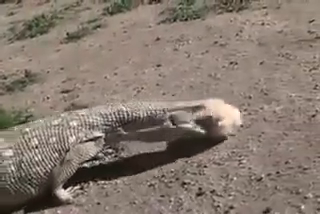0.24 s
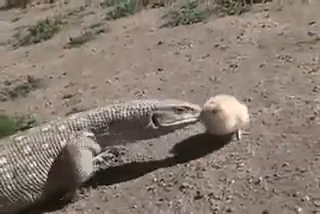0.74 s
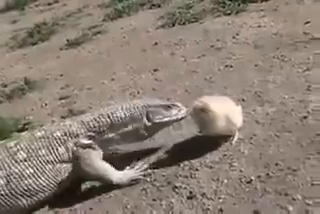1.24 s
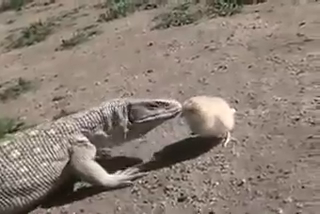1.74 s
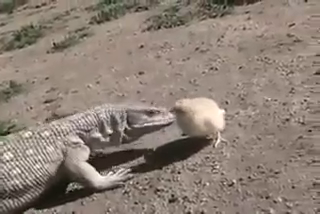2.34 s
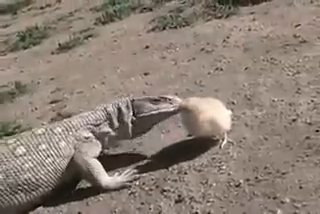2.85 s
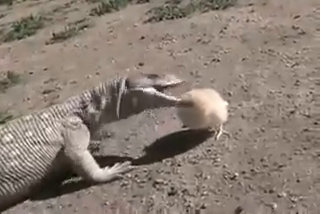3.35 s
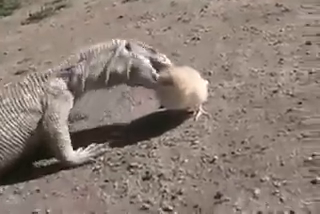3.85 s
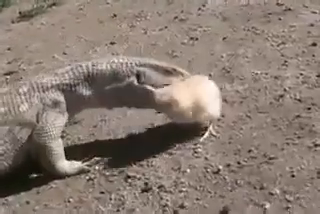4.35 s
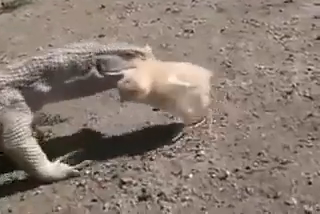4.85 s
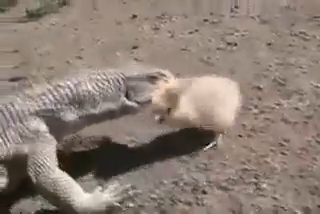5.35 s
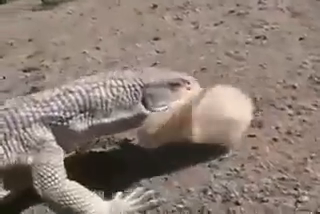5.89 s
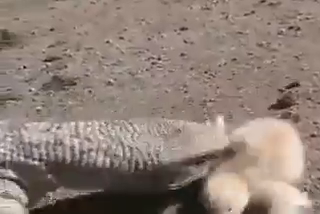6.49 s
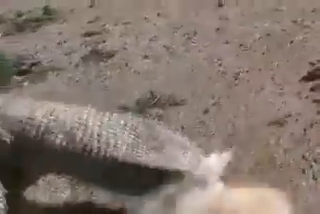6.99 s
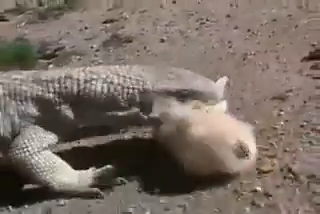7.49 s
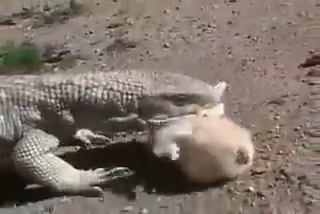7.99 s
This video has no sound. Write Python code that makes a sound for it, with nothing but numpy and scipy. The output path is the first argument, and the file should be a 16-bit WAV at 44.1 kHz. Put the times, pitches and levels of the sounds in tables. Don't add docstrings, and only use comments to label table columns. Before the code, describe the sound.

Throughout, a quiet low wash of distant traffic and wind with a wavering engine hum, swelling slightly near 1.3 and 5.2 s. From 0 to 1.5 s, faint songbirds repeat chirps and thin whistles at a distance, with tiny dry leaf rustles; a near chick gives soft rising peeps at 0.2, 0.5 and 0.9 s, then 2.2 s. Far birds return from 2.4 s, including a quick falling trill at 3.1-3.5 s. Softly brighter peeps come at 4.3, 4.6 and 4.9 s, with scattered grit clicks. At about 5.3 s the first loud, piercing distress peep swells, followed at 5.9, 6.4, 6.9, 7.5 and 8.0 s by more, strained around 5 kHz, hoarse and cracking sharply downward. Dull gravel ticks cluster between 5.4 and 6.5 s; a far low hoot wavers at 5.9-6.4 s. Close outdoor stereo, almost dry, slight ground echo, limited treble.

```python
import sys
import numpy as np
from scipy import signal
from scipy.fft import rfft, irfft, next_fast_len
from scipy.io import wavfile
from scipy.ndimage import uniform_filter1d

SR = 44100
rng = np.random.default_rng(int(sys.argv[2]) if len(sys.argv) > 2 else 0)


def inscribe(sig):
    pcm = np.round(np.clip(np.atleast_2d(sig).T, -1, 1) * 32767)
    wavfile.write(sys.argv[1], SR, pcm.astype(np.int16))


def how_loud(loudness_db):
    steps = np.asarray(loudness_db, float) / 20
    return 10 ** steps


N = 362943

# (frequency [Hz], density [dB per Hz])
WASH_SPECTRUM = [(25, -44), (58, -2.5), (169, -6), (520, -17.5), (1140, -17.5), (1600, -27.5), (6200, -37),
                 (10000, -43.5)]
# (time [s], level [dB])
WASH_LEVEL_DB = [(0.0, -55.5), (6.17, -53.5), (7.15, -56.5), (7.36, -52.5), (8.23, -54)]
# (frequency [Hz], left-right likeness [-1 to 1])
WASH_LIKENESS = [(40, 0.29), (130, 0.15), (300, 0.16), (600, 0.16), (1200, 0.065), (2500, 0.67),
                 (5000, 0.2), (10000, .2)]
# (frequency [Hz], left minus right [dB])
WASH_BALANCE_DB = [(60, -4), (170, -0.5), (480, 0.5), (1350, -0.5), (3830, 1.5), (10800, -2.5)]
# (frequency [Hz], level [dB])
ENGINE_LINES = [(68, -62), (136, -62), (204, -64.5), (990, -72.5), (1163, -74.5), (1346, -74),
                (1690, -79.5), (1890, -76.5)]
# (middle [s], length [s], rise [dB])
ENGINE_LOAD = [
    (1.35, .75, 8),
    (5.25, .55, 6),
]

# (length [s], start [Hz], middle [Hz], end [Hz])
UP = (.088, 2620, 3080, 3050)
DOWN = (.14, 2630, 2400, 2280)
COO = (0.0634, 1500, 1950, 1740)
PIP = (0.085, 2450, 2900, 2940)
LIFT = (.12, 2250, 2310, 2460)
# (start [s], note shape, level [dB])
SONGS = [(.124, UP, -59), (.221, DOWN, -61), (.525, UP, -54), (.593, DOWN, -60), (.947, UP, -59.5),
         (1.032, DOWN, -60), (1.393, UP, -59.5), (1.476, DOWN, -61), (.03, COO, -61), (.415, COO, -58),
         (.834, COO, -58), (1.276, COO, -61), (2.409, LIFT, -62), (2.735, PIP, -66), (2.8, LIFT, -62),
         (2.925, PIP, -62), (2.985, LIFT, -57), (3.1, PIP, -63), (3.15, LIFT, -63), (3.565, PIP, -61),
         (3.63, LIFT, -58.5), (3.8, LIFT, -64), (4.655, PIP, -58.5), (4.73, LIFT, -59), (.615, PIP, -57)]
# (start [s], length [s], start [Hz], end [Hz], level
# [dB])
FAR_WHISTLES = [(.2, 0.13, 4900, 4960, -61.5), (0.39, 0.26, 4780, 4840, -60.5),
                (.433, .11, 3550, 3960, -65), (.67, .042, 5400, 5300, -65), (0.79, .05, 4350, 4500, -64),
                (.79, 0.055, 5400, 5200, -63), (.928, .08, 5350, 5000, -61),
                (2.56, 0.57, 4440, 4180, -65.5), (3.173, .05, 3680, 4000, -57),
                (3.287, .048, 3810, 3560, -57), (3.205, .04, 2300, 3600, -65),
                (3.48, 0.045, 2400, 4000, -63), (3.55, .04, 2000, 3000, -66), (3.87, 0.12, 4600, 4520, -63),
                (3.98, .1, 4520, 4480, -58), (5.699, .19, 4080, 4010, -61), (3.415, .05, 2320, 4300, -62),
                (5.722, 0.037, 3200, 3040, -54.5), (7.863, 0.1, 4034, 3880, -61),
                (7.75, .055, 3300, 2950, -56), (.84, 0.045, 4350, 4800, -67), (2.98, .15, 4250, 4200, -62),
                (4.235, .03, 3400, 3100, -60), (3.38, .05, 3000, 3200, -66), (3.66, .05, 2100, 3100, -66),
                (1.0, 1.0, 5800, 5780, -80), (4.06, .09, 4500, 4480, -63)]
# (start [s], start [Hz], level [dB])
TRILL_NOTES = [(3.13, 5120, -57.5), (3.195, 5130, -61), (3.254, 5140, -55.5), (3.315, 5240, -61),
               (3.375, 4880, -49.5), (3.44, 4920, -59)]
# (start [s], length [s], centre [Hz], width [Hz], level [dB])
BUSH_CHATTER = [
    (0.13, 1, 4600, 2400, -66),
    (3.3, 0.49, 4700, 300, -65),
    (3.98, 0.2, 500, 350, -51.5),
    (5, .5, 420, 250, -58.5),
    (3.35, 0.64, 3200, 2500, -62.5),
    (3.42, .34, 4800, 600, -65),
    (3.84, .32, 4600, 350, -67),
    (3.8, .1, 3800, 700, -67),
]
# (start [s], length [s], centre [Hz],
# level [dB])
LEAF_RUSTLES = [(.11, .05, 6500, -68), (.52, 0.052, 6300, -67), (0.933, 0.058, 6800, -67),
                (1.53, .04, 7500, -70), (2.052, .1, 8000, -66), (2.948, 0.045, 7200, -70),
                (3.57, 0.054, 7200, -69), (3.8, .04, 7300, -67), (4.12, .04, 6540, -64),
                (4.468, .05, 7500, -63), (4.95, .07, 7500, -67), (6.75, .03, 8500, -65),
                (6.73, .19, 4500, -66), (7.74, .08, 4300, -59.5)]
# (start [s], length [s], start [Hz], top [Hz], level [dB])
SOFT_PEEP_NOTES = [
    (0.22, 0.07, 2200, 3440, -53),
    (0.518, 0.087, 2140, 3920, -43),
    (0.922, 0.051, 2900, 3620, -48),
    (2.227, 0.046, 2810, 3630, -48),
    (4.266, 0.075, 2110, 3840, -45),
    (4.609, 0.064, 2200, 3870, -42.5),
    (4.948, 0.063, 2300, 3790, -44.5),
]
# (time [s], peak [dB], centre [Hz])
GRIT_TICKS = [(3.657, -42, 1700), (4.498, -35, 1600), (5.384, -32.5, 1310), (5.513, -34.5, 867),
              (5.639, -37, 980), (5.741, -36, 800), (5.814, -33, 891), (5.854, -31, 760),
              (5.895, -29.5, 821), (5.94, -30, 830), (5.974, -31, 810), (6.012, -29.5, 803),
              (6.054, -34, 834), (6.109, -41.5, 794), (6.214, -40.5, 826), (6.272, -37, 800),
              (6.326, -33.5, 829), (6.426, -33, 668), (6.527, -34, 730)]
# (time [s], peak [dB], centre [Hz])
BRIGHT_TICKS = [(1.55, -61, 7500), (2.468, -40.5, 8170), (3.752, -47, 3100), (3.885, -48, 3400),
                (4.44, -46, 3900), (5.084, -41, 3200), (5.386, -30.5, 2800)]

# (time [s], pitch [Hz], effort [dB])
LOUD_PEEPS = [
    [(5.238, 3660, -46), (5.28, 4790, -31.5), (5.325, 5124, -25), (5.371, 5375, -12), (5.435, 5345, -9.5),
     (5.507, 4880, -13.5), (5.548, 4790, -22.5), (5.585, 4746, -22.5), (5.688, 3550, -38.5)],
    [(5.911, 3330, -32), (5.926, 4300, -27.5), (5.946, 4697, -14), (5.99, 5216, -11.5), (6.04, 5240, -9),
     (6.07, 5147, -11), (6.102, 4680, -13), (6.122, 3420, -14), (6.202, 2220, -31)],
    [(6.421, 3697, -22), (6.442, 4420, -15), (6.478, 5090, -9), (6.525, 5150, -9.5), (6.595, 5050, -10.5),
     (6.619, 4560, -9), (6.628, 3230, -15), (6.66, 2903, -17.5), (6.7, 2328, -31.5)],
    [(6.93, 4200, -21), (6.947, 5080, -15), (6.972, 5180, -19), (7.008, 5360, -9), (7.076, 5380, -10.5),
     (7.105, 4870, -15.5), (7.127, 4550, -10), (7.135, 3420, -15), (7.21, 2210, -25.5)],
    [(7.464, 4446, -32), (7.52, 5113, -19), (7.566, 5200, -22), (7.606, 5384, -19.5), (7.638, 5046, -12),
     (7.658, 4500, -7), (7.667, 3600, -13.5), (7.704, 2863, -19), (7.73, 2075, -30)],
    [(7.982, 3698, -26.5), (8.002, 4497, -21.5), (8.03, 4866, -22), (8.058, 5013, -15), (8.137, 5088, -9.5),
     (8.16, 4600, -8), (8.173, 3250, -14.5), (8.214, 2887, -20), (8.245, 1850, -21)],]
PEEP_BRIGHT_DB = [-5, 6.5, -3, -8, -14, -8]
# (multiple of pitch [1], level [dB])
OVERTONE_LINES = [(2, 2), (3, -10), (4, -32)]
# (multiple of pitch [1], level [dB])
HALF_LINE_PARTIALS = [(.5, -18), (1.5, 0.5), (2.5, -18), (3.5, -22)]
# (pitch [Hz], octave over effort [dB])
OCTAVE_RULE = [(2500, -11), (3050, -1), (3400, -7.5), (4300, -20.5), (4900, -17), (5120, -18), (5200, -28),
               (5300, -52)]
# (pitch [Hz], half lines over effort [dB])
LOW_HALF_RULE = [(3000, -30), (3400, -30.5), (4200, -58)]
# (middle [s], length [s], half line [dB], lowest line over its rule [dB])
UNEVEN_STRETCHES = [(5.305, 0.037, -34.5, 9.5), (5.49, 0.067, -28.5, -2.5), (5.945, 0.017, -35.5, 11.5),
                    (6.097, 0.039, -41, -16), (6.172, 0.038, -21.5, -3), (6.462, .025, -41, -0.5),
                    (6.569, .035, -32, -2.5), (6.67, 0.049, -22.5, 1), (6.99, 0.052, -18.5, -7),
                    (7.188, .028, -22.5, 1.5), (7.546, 0.086, -26.5, 4), (7.684, 0.02, -22.5, -6.5),
                    (7.716, 0.022, -25, -6), (8.065, .12, -44.5, 16.5), (8.21, .03, -22.5, -9)]
# (middle [s], length [s], added flutter [0-1], rasp [dB])
HOARSE_STRETCHES = [(5.554, 0.038, .2, -57), (6.101, .04, .12, -39), (6.45, .04, .08, -39.5),
                    (6.56, .03, .05, -45), (6.612, 0.03, .14, -34), (5.305, .05, .04, -48),
                    (6.955, 0.045, 0.1, -37), (7.05, 0.05, 0.1, -50), (7.125, 0.021, .06, -40),
                    (7.482, .025, .12, -46.5), (7.545, .095, .03, -35.5), (7.6, .04, .15, -48),
                    (7.661, .02, .25, -41.5), (8.011, 0.047, .1, -46), (8.165, .02, .15, -32.5)]
# (time [s], length [s], depth [dB])
WHISTLE_CATCHES = [(5.295, .03, 11.5), (5.971, .025, 8), (6.146, .025, 6), (5.538, .006, 8),
                   (6.535, .012, 18), (6.977, .012, 14), (7.065, .012, 11), (7.13, .005, 6.5),
                   (7.664, .008, 9), (7.617, .008, 9), (7.678, .006, 6), (8.022, .008, 8), (8.149, .014, 8),
                   (8.171, .006, 5.5), (6.615, .006, -3.5), (7.121, .008, -3), (6.092, .012, 5)]
# (time [s], kick [Hz])
PITCH_KICKS = [
    (5.5, 60),
    (6.54, 239.6),
    (6.985, 59.9),
    (7.07, 110.4),
    (7.59, 150.3),
]
# (middle [s], length [s], offset [Hz], level re whistle [dB])
SECOND_SIDE_STRETCHES = [(5.564, .04, 650, -12), (6.106, .028, -560, -10), (6.45, 0.025, 1303, -19.5),
                         (6.612, .014, 400, -8), (6.947, 0.022, 380, -6), (7.047, 0.029, 190.3, -3),
                         (7.085, 0.033, 200, -6), (7.6, .03, 170, -6), (7.643, .026, -230, -12),
                         (7.99, .012, 800, -8.5), (8.008, .028, 300.5, -5), (8.165, 0.013, 421, -8.5)]
# (time [s], pitch [Hz], level [dB])
HOOT_CURVE = [
    (5.87, 804, -56),
    (5.899, 815, -49),
    (6.03, 821, -55),
    (6.109, 858, -50),
    (6.128, 828, -63),
    (6.19, 818, -54.5),
    (6.34, 835, -56.5),
    (6.44, 840, -63),
]

# (frequency [Hz], step [dB])
QUIET_STEP_DB = [(100, -78), (1000, -84), (3000, -89), (5500, -87), (6500, -87), (7350, -79.5), (8300, -90),
                 (10500, -92)]
# (frequency [Hz], reach [dB])
REACH_DB = [(300, 75), (2000, 60), (3500, 60), (5500, 33), (6300, 48), (8000, 54), (9200, 53), (10500, 90)]
# (frequency [Hz], depth [dB])
SINK_DB = [(60, 9), (700, 11), (1500, 6), (3500, 5), (4600, 0)]

KICK_DECAY_S = .014
ATTACK_S, ATTACK_DB, RELEASE_S, RELEASE_DB = 0.0044, 36, 0.0078, 28
CALM_FLUTTER, LOW_FLUTTER, WEAK_FLUTTER_PER_DB = .065, .045, 0.006
RASP_RE_EFFORT_DB = -48
CRACK_HZ_PER_S, CRACK_DB = 78000, 24.5
OCTAVE_SHARE, UNEVEN_OCTAVE_DB = 0.43, -13.5
LEFT_LAG_S, EDGE_HZ = 28e-6, 10405
STARVE_DB, STARVE_BACK_DB_PER_S = -36, 260


def evened(x):
    return x / np.sqrt(np.mean(x ** 2) + 1e-20)


def read(points, hz):
    f, value = np.transpose(points)
    return np.interp(np.log(hz + 1), np.log(f + 1), value)


def add(mix, start_s, sound):
    part = mix[..., round(start_s * SR):][..., :sound.shape[-1]]
    part += sound[..., :part.shape[-1]]


def stretch(t, middle_s, length_s):
    return np.minimum((2 * (t - middle_s) / length_s) ** 4, 40)


def wander(length, top_hz):
    pole = np.exp(2 * np.pi * top_hz / SR * (1j - 1) / np.sqrt(2))
    noise = rng.standard_normal(length + 900)
    smooth = signal.lfilter([1, 2, 1], [1, -2 * pole.real, abs(pole) ** 2], noise)
    return evened(smooth[900:])


def tone(hz, multiple=1):
    return np.sqrt(2) * np.sin(2 * np.pi * multiple * np.cumsum(hz) / SR)


def fuzz(hz, width_hz):
    turn = np.exp(2j * np.pi * np.cumsum(hz) / SR)
    envelope = wander(len(hz), width_hz / 2) + 1j * wander(len(hz), width_hz / 2)
    return (envelope * turn).real


def fuzz_pair(hz, width_hz):
    return np.array([fuzz(hz, width_hz) for ear in range(2)])


def wash():
    frames, hz = N // 256 + 5, np.fft.rfftfreq(1024, 1 / SR)
    a, b, c, d, patches = rng.standard_normal((frames, 513, 5)).T
    patches = uniform_filter1d(patches, size=8, axis=0)
    patches = evened(uniform_filter1d(patches, size=16, axis=1))
    flicker = evened(uniform_filter1d(rng.standard_normal((frames, 513)).T, size=60, axis=0))
    streaks = evened(uniform_filter1d(rng.standard_normal((frames, 513)).T, size=24, axis=1))
    same = np.clip(read(WASH_LIKENESS, hz), -1, 1)[:, None]
    left = a + 1j * b
    right = same * left + np.sqrt(1 - same ** 2) * (c + 1j * d)
    z = np.array([left, right])
    drift_db = 1.8 * patches + 1.9 * flicker + 2.6 * streaks * (hz > 3000)[:, None]
    z *= how_loud(read(WASH_SPECTRUM, hz)[:, None] + drift_db)
    z *= how_loud(np.array([[.5], [-.5]]) * read(WASH_BALANCE_DB, hz))[:, :, None]
    level_db = np.interp(np.arange(N) / SR, *np.transpose(WASH_LEVEL_DB))
    sound = signal.istft(z, nperseg=1024, noverlap=768)[1][:, :N]
    return how_loud(level_db + 6.5) * evened(sound)


def hum():
    out, t = np.zeros((2, N)), np.arange(N) / SR

    def slow(top_hz):
        return np.interp(t, t[::64], wander(len(t[::64]), 64 * top_hz))

    load_db = sum(db * np.exp(-stretch(t, at, length)) for at, length, db in ENGINE_LOAD)
    for k, (hz, db) in enumerate(ENGINE_LINES):
        turns = np.cumsum(hz + 2.2 * slow(2.5)) / SR
        level_db = db + 4.5 + (k == 2) * load_db + np.clip(3 * slow(3.0), -9, 3.5)
        out += how_loud(level_db) * np.sin(2 * np.pi * (turns + 0.34 * rng.random((2, 1))))
    return out


def note(length_s, start_hz, middle_hz, end_hz, db, turn=0.62, octave_db=-40, grain=.3, foot_db=0):
    u = np.linspace(0, 1, round(length_s * SR))
    rise = start_hz + (middle_hz - start_hz) * np.sin(np.pi / 2 * u / turn)
    bend = middle_hz + (end_hz - middle_hz) * ((u - turn) / (1 - turn)) ** 2
    hz = np.where(u < turn, rise, bend)
    shape = signal.windows.tukey(len(u), .3) * (0.56 + 0.43 * np.sin(np.pi * u ** 1.3))
    foot = np.clip(1.4 * (middle_hz - hz) / (middle_hz - start_hz + 1), 0, .8)
    shape = shape * how_loud(foot_db * np.sin(np.pi * foot))
    shape = shape * (1 + .25 * wander(len(u), 60))
    body = (1 - grain / 2) * tone(hz) + grain * fuzz(hz, 160)
    octave = how_loud(octave_db) * (0.73 * tone(hz, 2) + 0.83 * fuzz(2 * hz, 420))
    return how_loud(db) * shape * (body + octave)


def far_birds():
    far = np.zeros(N)
    for s, shape, db in SONGS:
        add(far, s, note(*shape, db, grain=0.45))
    for s, length, start_hz, end_hz, db in FAR_WHISTLES:
        whistle = note(length, start_hz, (start_hz + end_hz) / 2, end_hz, db + 1.0, grain=0.38)
        swell = np.hanning(len(whistle)) ** 0.18
        add(far, s, whistle * how_loud(2.0 * wander(len(whistle), 25)) * swell)
    for s, hz, db in TRILL_NOTES:
        add(far, s, note(0.0324, hz, .94 * hz, 0.88 * hz, db + 1.5, grain=.12))
    for s, length, hz, width_hz, db in BUSH_CHATTER:
        swell = np.hanning(round(length * SR)) ** 0.12
        level_db = db + 1.3 * wander(len(swell), 23)
        add(far, s, how_loud(level_db) * swell * fuzz(hz + 0 * swell, width_hz))
    return far


def rustles():
    out = np.zeros((2, N))
    for s, length, hz, db in LEAF_RUSTLES:
        swell = np.hanning(round(length * SR)) ** .4
        add(out, s, how_loud(db) * swell * fuzz_pair(hz + 0 * swell, 3100))
    return out


def soft_peeps():
    near = np.zeros(N)
    for s, length, start_hz, top_hz, db in SOFT_PEEP_NOTES:
        octave_db = -15 if s > 4 else -25
        add(near, s, note(length, start_hz, top_hz, 3150, db, turn=0.64, grain=0.21, foot_db=-1.5,
                          octave_db=octave_db))
    return near


def grit():
    out, t = np.zeros((2, N)), np.arange(400) / SR
    fade_db = -4 - 60 * t / .012
    for s, db, hz in GRIT_TICKS + BRIGHT_TICKS:
        puff = fuzz_pair(hz + 0 * t, (1.2 + .7 * (hz > 1200)) * hz)
        add(out, s, how_loud(db + fade_db) * (1.1 * np.sin(2 * np.pi * hz * t) + 0.54 * puff))
    return out


def low_register(hz):
    return np.clip(6 - hz / 600, 0, 1)


def voice(rows, bright_db):
    s, pitch_hz, db = np.transpose(rows)
    t = np.arange(s[0], s[-1], 1 / SR)
    hz = uniform_filter1d(np.interp(t, s, pitch_hz), size=150, mode="nearest")
    hz = hz * (1 + .005 * wander(len(t), 45))
    kick_hz = sum(kick * (t > at) * np.exp(-abs(t - at) / KICK_DECAY_S) for at, kick in PITCH_KICKS)
    hz = hz + uniform_filter1d(kick_hz, size=120)

    attack_db = ATTACK_DB * np.exp((s[0] - t) / ATTACK_S)
    release_db = RELEASE_DB * np.exp((t - s[-1]) / RELEASE_S)
    effort_db = np.interp(t, s, db) - attack_db - release_db
    catch_db = sum(depth * np.exp(-((t - at) / length) ** 2 * 4) for at, length, depth in WHISTLE_CATCHES)
    whistle_db = effort_db - catch_db

    uneven_db = [db - 12 * stretch(t, at, length) for at, length, db, low in UNEVEN_STRETCHES]
    half_db = np.maximum(effort_db + read(LOW_HALF_RULE, hz), np.max(uneven_db, axis=0))
    lowest_db = np.transpose(UNEVEN_STRETCHES)[-1][np.argmax(uneven_db, axis=0)]

    hoarse_db = [db - 6 * stretch(t, at, length) for at, length, more, db in HOARSE_STRETCHES]
    rasp_db = np.max([effort_db + RASP_RE_EFFORT_DB] + hoarse_db, axis=0)
    flutter = CALM_FLUTTER + LOW_FLUTTER * low_register(hz) - WEAK_FLUTTER_PER_DB * (whistle_db + 10)
    flutter = flutter + sum(more * np.exp(-stretch(t, at, length))
                            for at, length, more, db in HOARSE_STRETCHES)

    fall_hz_per_s = -uniform_filter1d(np.gradient(hz), size=200) * SR
    cracked = np.clip(fall_hz_per_s / CRACK_HZ_PER_S - 1, 0, 1)
    high_db = bright_db - (1 - OCTAVE_SHARE) * (effort_db + 16.0)
    octave_db = effort_db + read(OCTAVE_RULE, hz) + high_db * np.clip(hz / 600 - 6, 0, 1)
    octave_db = octave_db - CRACK_DB * cracked * np.clip(hz / 300 - 12, 0, 1)
    octave_db = np.maximum(octave_db, half_db + UNEVEN_OCTAVE_DB)
    octave_db = octave_db + 3 * (hz > 3600) * wander(len(t), 30)
    return s, t, hz, whistle_db, octave_db, half_db, lowest_db, rasp_db, np.clip(flutter, 0, .6)


def throb(length, depth):
    shared = np.array([wander(length, 250)] * 2)
    own = np.array([wander(length, 150), wander(length, 150)])
    return 1 + depth * shared + 0.14 * own


def syrinx_whistle(t, hz, whistle_db, flutter):
    n = len(t)
    main = tone(hz) * throb(n, 1.05 * flutter) + 0.36 * flutter * fuzz(1.07 * hz, 770)
    second_db = np.max([db - 12 * stretch(t, at, length)
                        for at, length, offset, db in SECOND_SIDE_STRETCHES], axis=0)
    nearest = np.argmin([abs(t - row[0]) for row in SECOND_SIDE_STRETCHES], axis=0)
    offset_hz = np.transpose(SECOND_SIDE_STRETCHES)[2][nearest]
    second = tone(hz + offset_hz * (1 + .12 * wander(n, 60))) * throb(n, .25)
    whistle = how_loud(whistle_db) * main + how_loud(whistle_db + second_db) * second
    whistle = whistle / (1 + 0.47 * how_loud(second_db))
    crack = np.clip(-uniform_filter1d(np.gradient(hz), size=400) * SR / 60000, 0, 1)
    return whistle + how_loud(whistle_db - 17.5) * crack * fuzz_pair(hz, 1600)


def syrinx_overtones(hz, octave_db, flutter, bright_db):
    n = len(hz)
    lines = 0
    for k, db in OVERTONE_LINES:
        dull_db = np.maximum(k * hz - 8900, 0) * 0.0075 + np.maximum(2950 - hz, 0) * .016
        line_db = db + (k > 2) * (.7 * bright_db + 4.5 - dull_db)
        lines = lines + how_loud(line_db) * tone(hz, k)
    lines = how_loud(octave_db) * lines * throb(n, 0.15 + flutter) * throb(n, 0.088)
    air = fuzz_pair(2 * hz, 860) + .2 * low_register(hz) * fuzz_pair(3.3 * hz, 2200)
    return lines + how_loud(octave_db - 19 + 40 * flutter) * air


def syrinx_half_lines(hz, half_db, lowest_db, flutter):
    n = len(hz)
    lowest_db = lowest_db + 5 * (hz < 3300) + 3.5 * wander(n, 45)
    half_db = half_db + 2.2 * wander(n, 60)
    lines = sum(how_loud(db + (k < 1) * lowest_db) * tone(hz, k) for k, db in HALF_LINE_PARTIALS)
    lines = how_loud(half_db) * lines * throb(n, 0.08 + 0.7 * flutter)
    smear = sum(how_loud(0.95 * db + (k < 1) * (.6 * lowest_db + 3)) * fuzz_pair(k * hz, 400)
                for k, db in HALF_LINE_PARTIALS)
    return lines + how_loud(half_db - 9.0 - 3 * low_register(hz)) * smear


def syrinx_rasp(hz, rasp_db):
    n = len(hz)

    def patch(centre_hz):
        return how_loud(-14 + 5.6 * np.clip(wander(n, 22), -3, 1.5)) * fuzz(centre_hz, 1300)

    def port():
        level_db = rasp_db + 1.0 + np.minimum(4.5 * wander(n, 40), 6)
        air = fuzz(1.07 * hz, 1500) + patch(1.45 * hz) + patch(1.6 * hz) + 0.81 * patch(.62 * hz)
        return how_loud(level_db) * air

    return np.array([port() for ear in range(2)])


def peep(rows, bright_db):
    s, t, hz, whistle_db, octave_db, half_db, lowest_db, rasp_db, flutter = voice(rows, bright_db)
    hz = hz * (1 + 0.041 * flutter * wander(len(t), 250))
    sound = syrinx_whistle(t, hz, whistle_db, flutter)
    sound = sound + syrinx_overtones(hz, octave_db, flutter, bright_db)
    sound = sound + syrinx_half_lines(hz, half_db, lowest_db, flutter)
    sound = sound + syrinx_rasp(hz, rasp_db)
    return s[0], sound * signal.windows.tukey(len(t), .015)


def loud_peeps():
    chick = np.zeros((2, N))
    for rows, bright_db in zip(LOUD_PEEPS, PEEP_BRIGHT_DB):
        add(chick, *peep(rows, bright_db))
    chick[:, 60:] += .12 * chick[:, :-60]
    t = np.arange(9000) / SR
    decay = how_loud(-60 * t / .09) + how_loud(-22 - 60 * t / 0.41)
    scatter = rng.standard_normal((2, 9000)) * decay
    tail = signal.oaconvolve(chick, scatter / np.linalg.norm(scatter[0]), axes=1)[:, :N]
    return how_loud([[-.6], [.6]]) * (chick + how_loud(-24.5) * tail)


def hoot():
    near = np.zeros(N)
    s, hz, db = np.transpose(HOOT_CURVE)
    t = np.arange(s[0], s[-1], 1 / SR)
    level_db = np.interp(t, s, db) + np.clip(5.5 * wander(len(t), 28), -14, 4)
    sound = how_loud(level_db) * tone(np.interp(t, s, hz))
    add(near, s[0], sound * signal.windows.tukey(len(t), .1))
    return near


def through_leaves(near, far):
    scatter = rng.standard_normal((2, 3000)) * how_loud(-60 * np.arange(3000) / SR / 0.36)
    source = (far + .15 * near)[None]
    wet = signal.oaconvolve(source, scatter / np.linalg.norm(scatter[0]), axes=1)[:, :N]
    return near + 1.02 * far + .75 * wet


def scene():
    yard = wash() + hum()
    far = far_birds()
    claws = rustles() + grit()
    near = soft_peeps() + hoot()
    return yard + through_leaves(near, far) + claws + loud_peeps()


def coarse(x):
    hz, t, z = signal.stft(x, SR, "cosine", nperseg=1024, noverlap=512)
    power = abs(z) ** 2 + 1e-16

    def level_db(low_hz, high_hz):
        return 10 * np.log10(power[:, (hz > low_hz) & (hz < high_hz)].sum(1, keepdims=True))

    band = uniform_filter1d(power, size=16, axis=1)[:, 8::16].repeat(16, axis=1)
    band_db = 10 * np.log10(band[:, np.minimum(np.arange(513), 511)])
    budget_db = 1.3 * evened(uniform_filter1d(rng.standard_normal(len(t)), size=18))
    jump = abs(np.gradient(level_db(2000, SR), axis=2)) > 7
    budget_db = budget_db + 19 * jump * (hz > 2600)[:, None]
    loud_step_db = level_db(0, SR) - read(REACH_DB, hz)[:, None]
    step_db = np.maximum(loud_step_db, read(QUIET_STEP_DB, hz)[:, None] + budget_db)
    fall_db = STARVE_BACK_DB_PER_S * t
    starve_db = np.maximum.accumulate(level_db(5900, 9000) + fall_db, axis=2) - fall_db - STARVE_DB
    sink_db = np.minimum(starve_db, starve_db - 62 - band_db)
    sink_db = np.clip(sink_db, 0, read(SINK_DB, hz)[:, None])
    z, band_db = z * how_loud(-sink_db), band_db - sink_db
    step = how_loud(np.maximum(step_db, band_db - 10))
    return signal.istft(step * np.round(z / step), SR, "cosine", nperseg=1024, noverlap=512)[1][:, :N]


def roll_off(x):
    return signal.sosfilt(signal.butter(12, 11420, fs=SR, output="sos"), x)


def record(dry):
    size = next_fast_len(N)
    hz = np.fft.rfftfreq(size, 1 / SR)
    late = np.exp(-2j * np.pi * hz * np.array([[LEFT_LAG_S], [0]]))
    over_hz = np.clip(np.maximum(hz - EDGE_HZ, -300) + 300, 0, None)
    edge = np.maximum(how_loud(-over_hz ** 1.47 * 0.002), 1e-5)
    overloaded = 1.696 * np.tanh(1.028 * dry / 1.703)
    x = irfft(rfft(coarse(overloaded), size) * late * edge, size)[:, :N]
    return roll_off(np.clip(x, -.998, .998))


dry = scene()
out = record(dry)
inscribe(out)
```